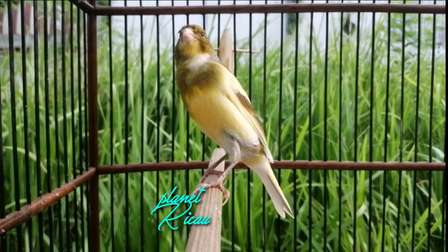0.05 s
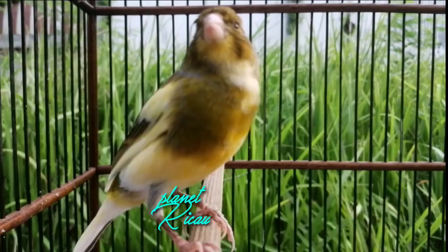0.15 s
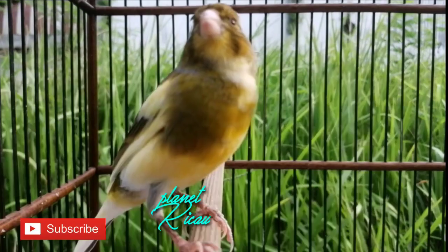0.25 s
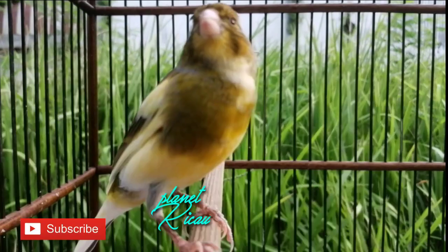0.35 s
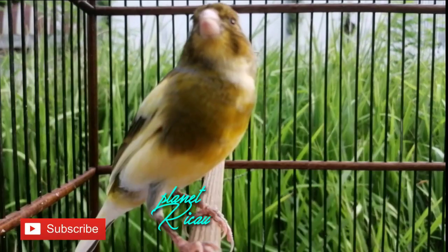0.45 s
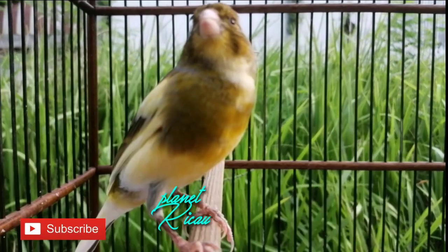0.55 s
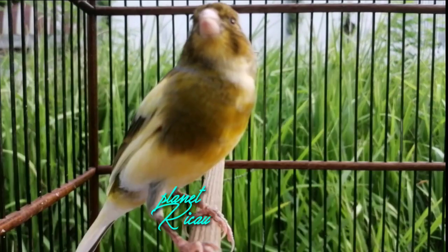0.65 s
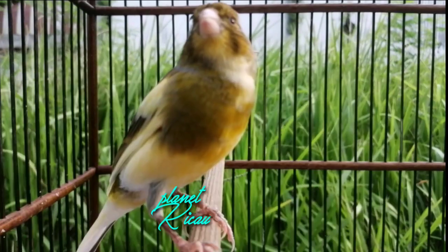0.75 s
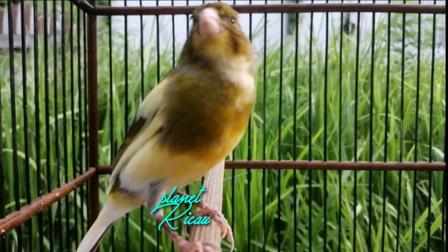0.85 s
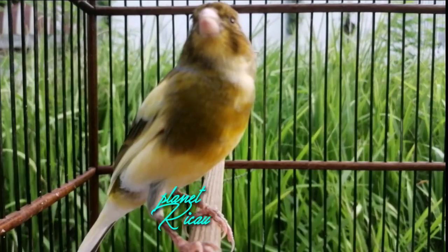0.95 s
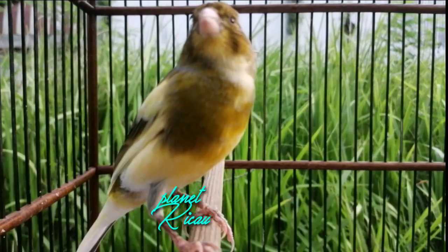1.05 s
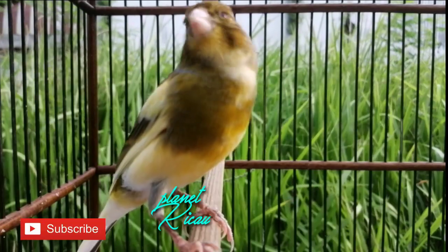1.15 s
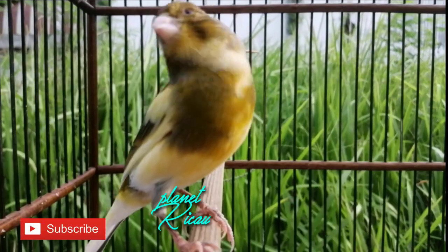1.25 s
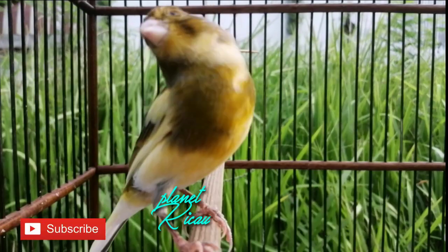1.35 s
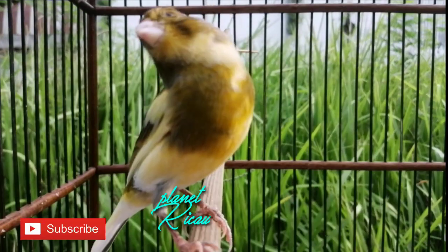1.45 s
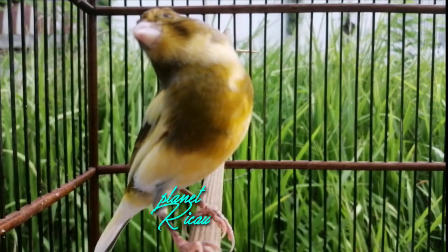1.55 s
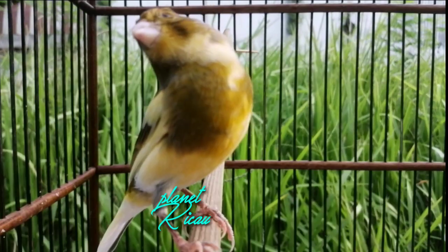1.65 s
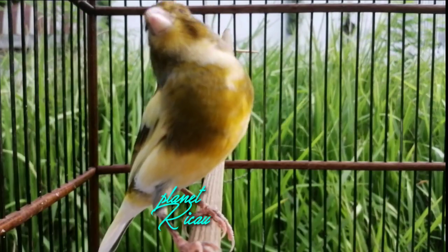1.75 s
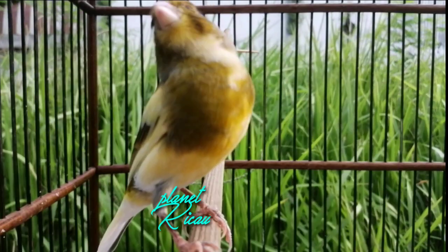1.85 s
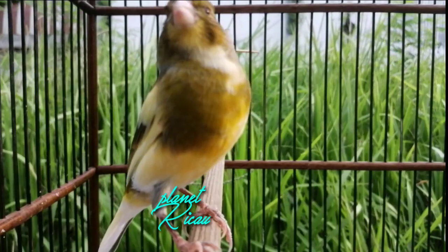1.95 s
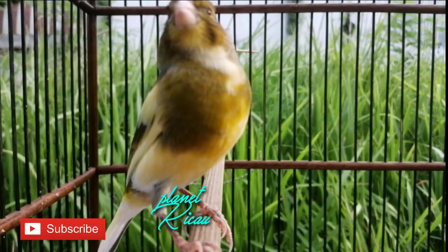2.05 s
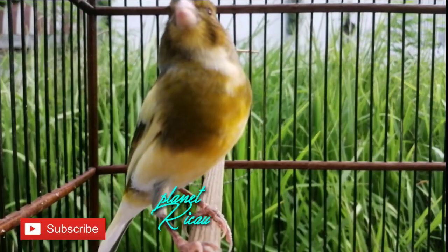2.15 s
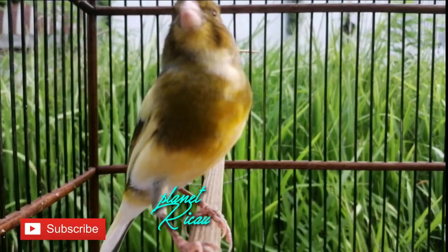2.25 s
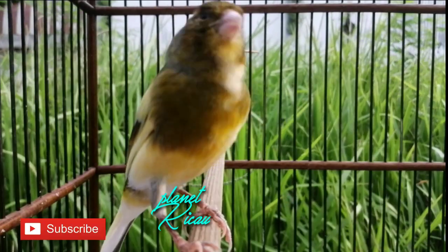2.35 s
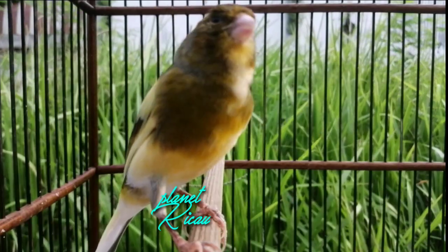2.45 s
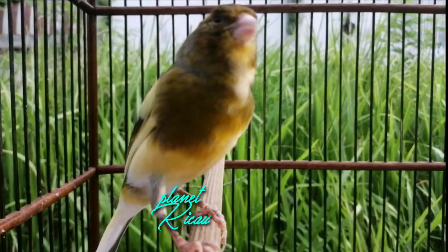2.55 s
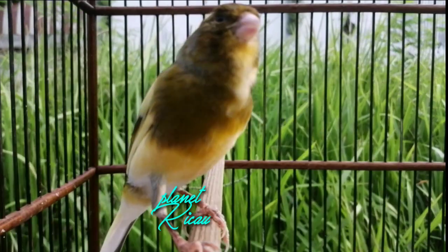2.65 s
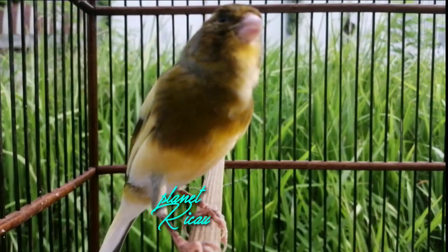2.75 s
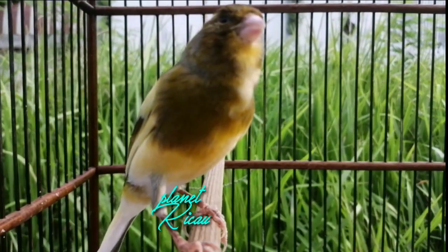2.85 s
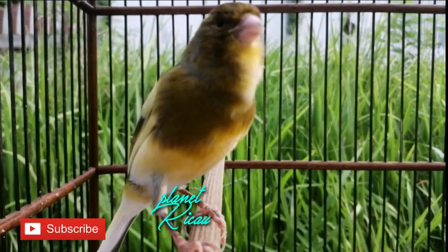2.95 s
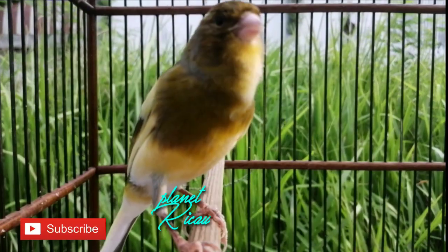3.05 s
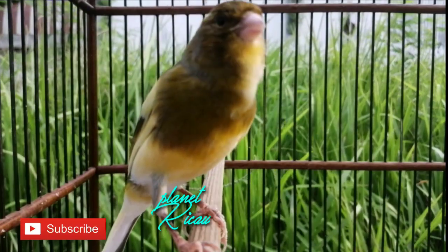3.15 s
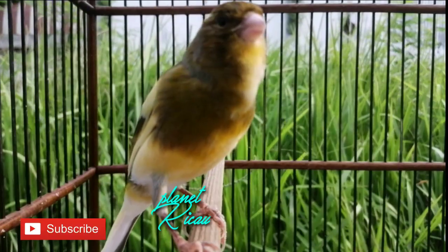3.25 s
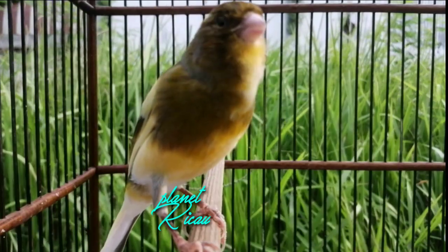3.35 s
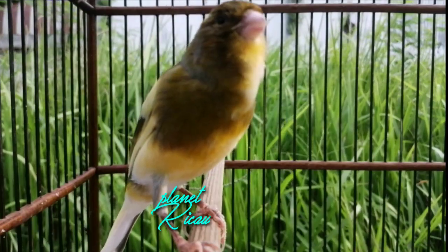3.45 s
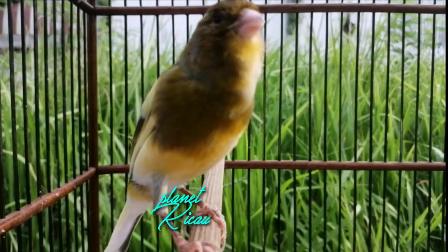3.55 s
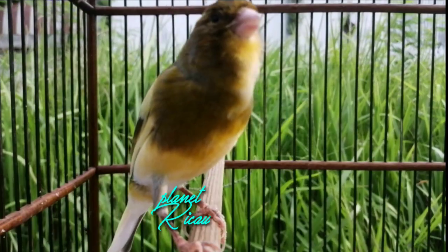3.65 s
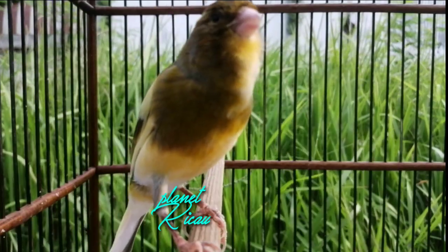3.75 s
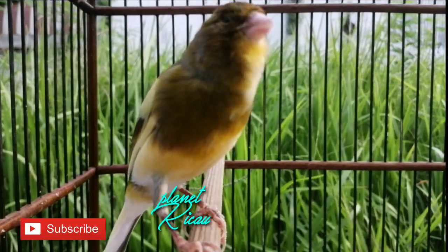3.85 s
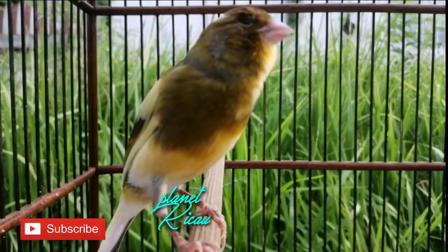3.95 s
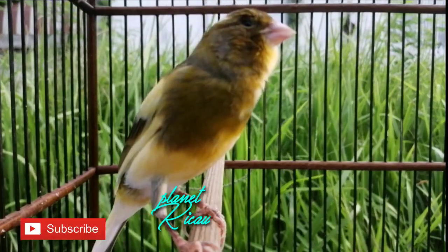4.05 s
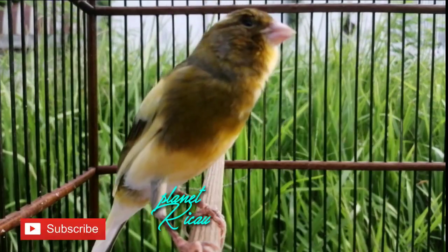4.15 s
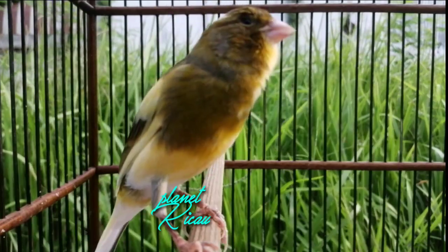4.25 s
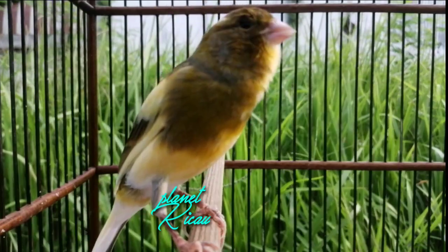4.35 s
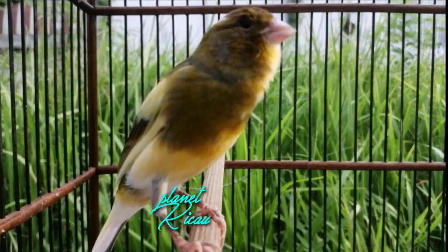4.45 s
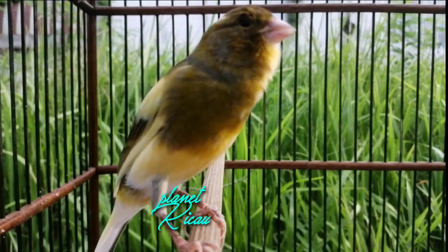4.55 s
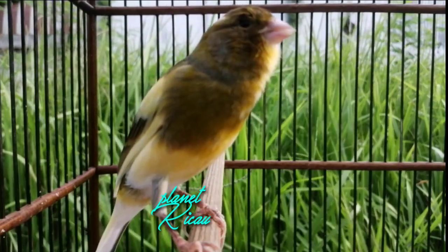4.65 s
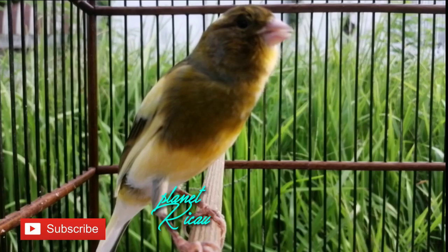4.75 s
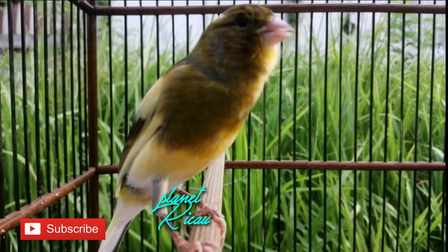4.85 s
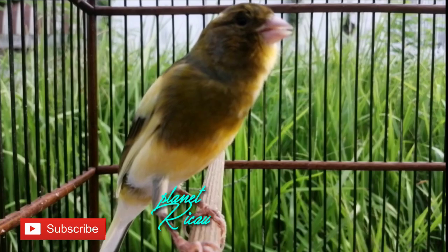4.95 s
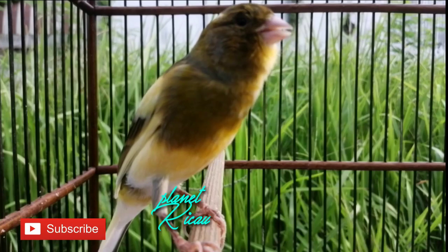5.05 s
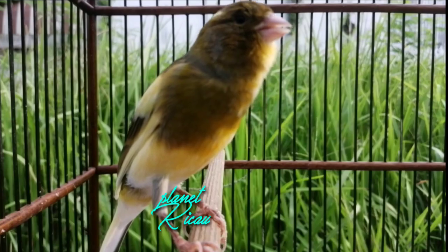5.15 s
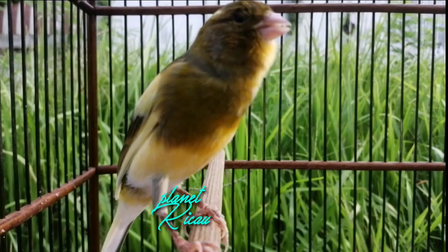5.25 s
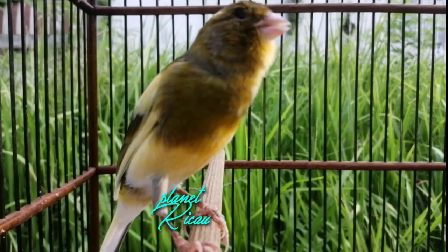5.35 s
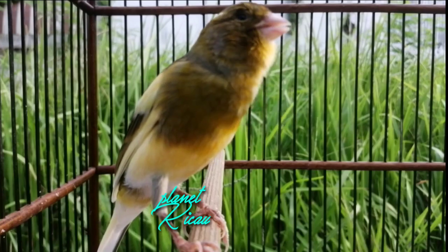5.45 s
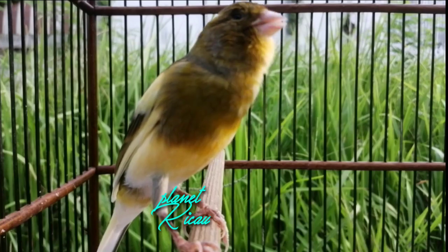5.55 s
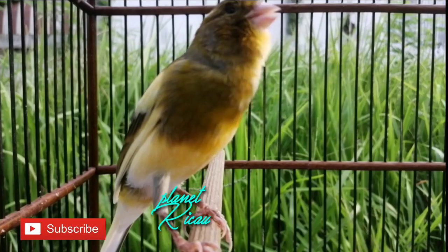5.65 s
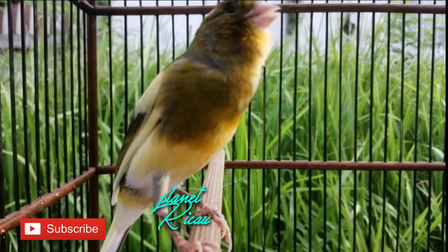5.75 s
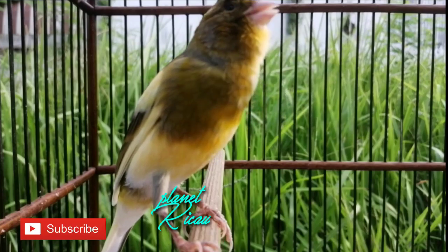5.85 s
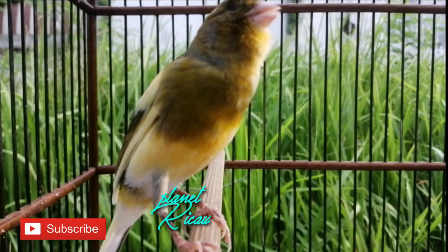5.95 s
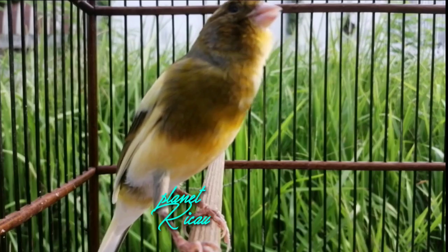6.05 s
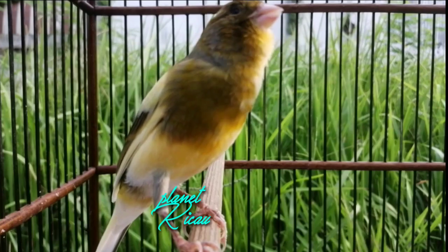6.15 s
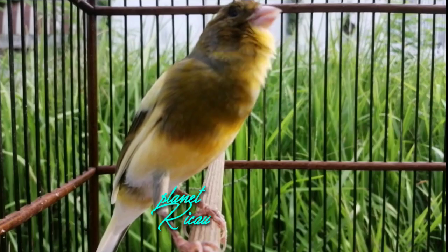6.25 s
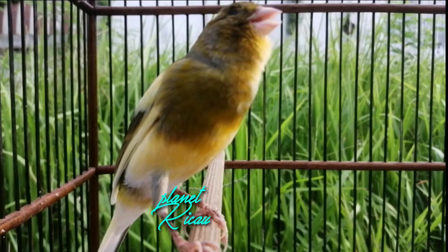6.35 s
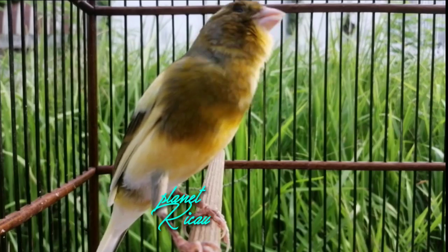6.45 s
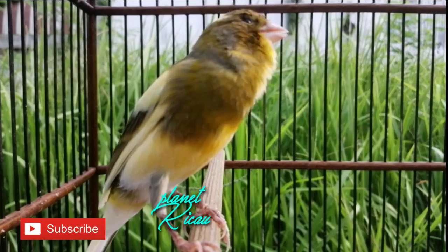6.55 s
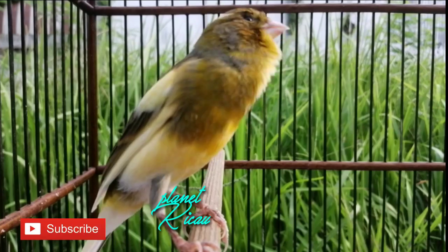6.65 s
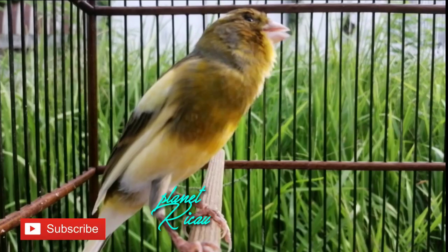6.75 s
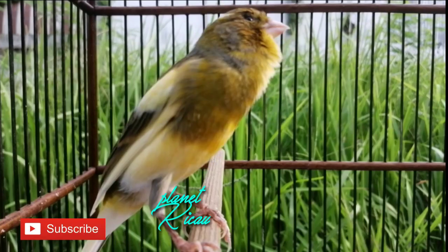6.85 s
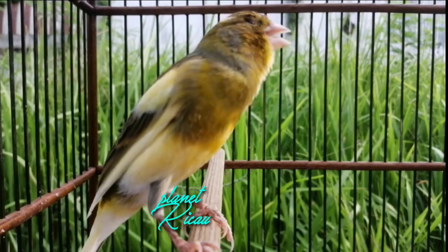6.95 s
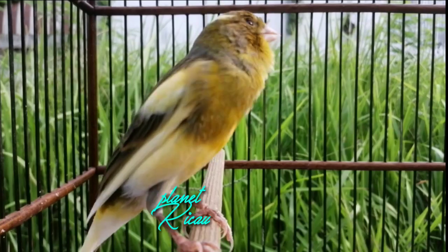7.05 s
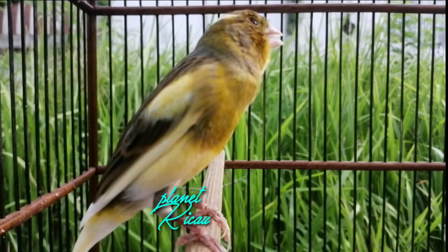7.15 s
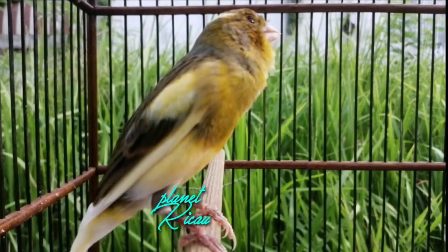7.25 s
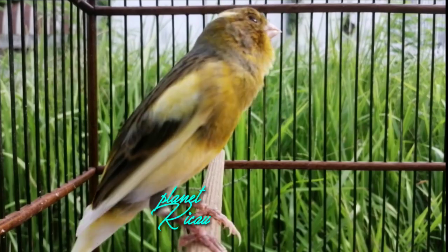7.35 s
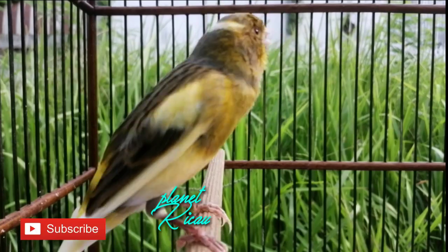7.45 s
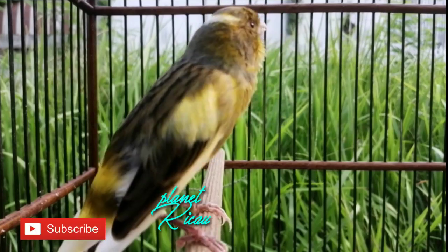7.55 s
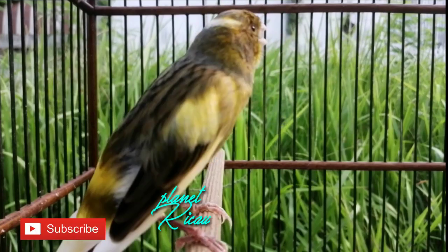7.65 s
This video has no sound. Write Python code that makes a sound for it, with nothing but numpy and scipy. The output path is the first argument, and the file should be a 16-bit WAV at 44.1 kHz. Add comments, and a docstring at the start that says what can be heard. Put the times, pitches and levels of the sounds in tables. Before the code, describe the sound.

Outdoors, a faint low rumble and thin airy hiss, with a second small bird twittering quietly far off. Near three seconds a close canary gives two soft, pure, falling chirps, then ticks into a fast trill that swells. Evenly repeated downward slides follow, each closed by a sharp low chip, and finally loud long whistles swoop from high to low. The microphone is close, with light scattered echoes.

```python
"""A caged canary close to the microphone gives two soft chirps, then sings: a fast trill that swells,
a tour of slides each closed by a sharp chip, and long falling whistles. A second small bird sings
faintly far off, over a low outdoor rumble. Both birds are nearly pure tones that follow drawn pitch
and level tracks, with weak harmonics and scattered echoes; the background is coloured noise and faint low tones."""
import sys
import numpy as np
from scipy import signal
from scipy.fft import rfft, irfft, next_fast_len
from scipy.io import wavfile
from scipy.ndimage import uniform_filter1d

SR = 44100
rng = np.random.default_rng(int(sys.argv[2]) if len(sys.argv) > 2 else 0)


def digitize_waveform(pressure):
    """Quantize a signal to 16-bit integers and store it at the path in sys.argv[1].

    Rows of a 2-D input are taken as channels; values are limited to [-1, 1].
    """
    field = np.atleast_2d(pressure).T
    bounded = np.clip(field, -1, 1)
    quanta = np.round(bounded * 32767).astype(np.int16)
    wavfile.write(sys.argv[1], SR, quanta)


N = 339129


def amp(db):
    """Decibels to a linear gain."""
    return 10 ** (np.asarray(db) / 20)


def evened(x):
    """Scales a signal to an rms of 1."""
    return x / np.sqrt(np.mean(x ** 2) + 1e-20)


def read(points, hz, column=1):
    """Reads a spectrum table, joined by straight lines on a log-frequency axis."""
    points = np.array(points, float)
    return np.interp(np.log(hz + 1), np.log(points[:, 0] + 1), points[:, column])


def curve(rows):
    """A time curve at every sample."""
    return np.interp(np.arange(N) / SR, *np.transpose(rows))


def drift(hz):
    """Smooth chance of rms 1: noise whose spectrum rolls off softly around hz."""
    size = next_fast_len(N)
    f = np.fft.rfftfreq(size, 1 / SR)
    noise = rfft(rng.standard_normal(size))
    return evened(irfft(noise * np.exp(-(f / hz) ** 2), size)[:N])


def stereo_noise(spectrum):
    """Noise of a given colour, most alike left and right near 90 Hz and diffuse in the treble."""
    # Left-right likeness. Each row: frequency in Hz, likeness from 0 to 1.
    likeness = [(30, 0.45), (90, 1), (200, 0.64), (400, 0.61), (800, 0.057), (2000, 0), (15000, 0)]
    hz = np.fft.rfftfreq(N, 1 / SR)
    left, other = rfft(rng.standard_normal((2, N)))
    same = np.clip(read(likeness, hz), -1, 1)
    right = same * left + np.sqrt(1 - same ** 2) * other
    return evened(irfft(np.array([left, right]) * amp(read(spectrum, hz)), N))


def rumble():
    """Distant low noise that swells and sinks along a drawn curve, with a tiny random unsteadiness."""
    # Colour of the outdoor rumble. Each row: frequency in Hz, relative level in dB per Hz.
    rumble_colour = [(12, -38), (20, -7.5), (97, 3), (119, -2), (147, -1.5), (201, -12.5), (241, -13.5),
                     (356, -15), (405, -24.5), (450, -36), (580, -50), (990, -120)]
    # Its swell. Each row: time in seconds, level in dB before the trims.
    rumble_swell = [(0, -52), (.25, -53), (1.1, -58), (1.55, -56.5), (1.8, -57.5), (3.7, -59.5), (4.4, -62),
                    (5.5, -62.5), (5.85, -60.5), (6.2, -63), (7.1, -63), (7.69, -60)]
    gust_db, gust_hz = 0.04, 5
    return stereo_noise(rumble_colour) * amp(curve(rumble_swell) - 1.0 + gust_db * drift(gust_hz))


def air_noise():
    """Soft, nearly even noise across the middle and treble."""
    # Colour of the air. Each row: frequency in Hz, relative level in dB per Hz.
    air_colour = [(200, -15), (450, 0), (700, 1), (1500, 0), (2500, -3), (4000, -8.5), (5300, -4),
                  (7000, -13), (9000, -15.5), (15000, -15)]
    # Its level. Each row: time in seconds, level in dB before the left-right trim.
    air_level = [(0, -65), (1.5, -65), (3, -65.5), (5, -66), (7.69, -68)]
    return stereo_noise(air_colour) * amp(curve(air_level) + 0.69 * drift(18))


def low_tones():
    """Faint distant sines, each swelling and fading with a slightly unsteady pitch."""
    # Each row: start in seconds, length in seconds, pitch in Hz, level in dB before the left-right trim.
    tones = [(.08, 0.19, 95.3, -53), (0.698, 0.17, 94.4, -56), (0.807, 0.21, 350, -68),
             (1.152, 0.34, 348.5, -69), (1.498, 0.15, 97.2, -52.5), (1.596, 0.34, 351, -69),
             (2.658, 0.21, 94.2, -59), (2.911, 0.23, 352, -68.5), (3.322, 0.33, 349.4, -71.5),
             (3.78, 0.15, 141.4, -55), (4.42, 0.1, 143, -58), (5.677, 0.3, 99.4, -56.5),
             (6.857, 0.15, 357, -73)]
    out = np.zeros(N)
    wander = 1 + 0.01 * drift(14.0)
    for s, length, hz, db in tones:
        at = np.arange(int(s * SR), min(int((s + length) * SR), N))
        phase = 2 * np.pi * np.cumsum(hz * wander[at]) / SR
        out[at] += amp(db) * signal.windows.tukey(len(at), .7) * np.sin(phase)
    return out


def background():
    """Rumble, air and low tones together, slightly louder on the right."""
    return (rumble() + air_noise() + low_tones()) * amp([[-.8], [.8]])


def tour(shape, notes):
    """Stretches and transposes one shape for each syllable: tracks of (s, Hz, dB)."""
    share, hz, db = np.transpose(shape)
    return [np.c_[s + share * length, hz * pitch, db + level] for s, length, pitch, level in notes]


def syrinx(tracks, jitter, flutter_db, waver_db, second_db=0, upper_db=0, top_db=0, rasp_db=-70):
    """A nearly pure tone follows each track, with a slight tremble, weak harmonics and a trace of rasp."""
    # Harmonics 2, 3 and 4 as the throat lets them out, one list each.
    # Each row: pitch of the note in Hz, level in dB against the fundamental before the boosts.
    throat = [
        [(2000, -22), (2500, -31), (3000, -46.5), (4400, -40), (5100, -39), (5600, -65.5), (6200, -33.5),
         (6800, -26), (7250, -20)],
        [(2500, -53), (3500, -53), (4400, -41.5), (4800, -36), (5200, -47.5)],
        [(2500, -54.5), (3000, -64.5), (3500, -61), (4000, -67)],
    ]
    boosts_db = [second_db, upper_db, upper_db]
    tremble = 1 + jitter * drift(500)
    unsteady_db = flutter_db * drift(640) + waver_db * drift(110)
    # the rasp level drifts up and down at random
    rasp = amp(rasp_db + 4 * drift(29)) * rng.standard_normal(N)
    out = np.zeros(N)
    for track in tracks:
        s, pitch, level = track.T
        at = np.arange(max(int(s[0] * SR), 0), min(int(s[-1] * SR), N))
        hz = uniform_filter1d(np.interp(at / SR, s, pitch), size=45) * tremble[at]
        loudness = amp(uniform_filter1d(np.interp(at / SR, s, level), size=25) + unsteady_db[at])
        loudness *= signal.windows.tukey(len(at), 60 / len(at))  # 30-sample fades
        phase = 2 * np.pi * np.cumsum(hz) / SR
        tone = np.sin(phase) + rasp[at]
        for harmonic, colour, boost_db in zip([2, 3, 4], throat, boosts_db):
            # a narrow beak (negative top_db) holds back the very top
            gape_db = top_db * np.interp(harmonic * hz, [11000, 13500], [0, 1])
            gain = amp(read(colour, hz) + boost_db + gape_db)
            tone += gain * np.sin(harmonic * phase) * (harmonic * hz < SR / 2)
        out[at] += loudness * tone
    return out


def room(x, gap_s):
    """Scattered reflections of random sign, different at each microphone, each band dying at its own speed."""
    # Echo of the surroundings. Each row: frequency in Hz, relative level in dB, 60 dB decay time in seconds.
    echo_decay = [(1000, -0.5, 0.33), (2800, 1, 0.23), (3820, 1.5, 0.25), (4970, -5.5, 0.28),
                  (7000, 13, 0.16), (9000, -17, .15), (14500, -7, 0.094)]
    count = 22050
    # reflections crowd together with time
    density = .003 + np.arange(count) / count * .03
    taps = rng.standard_normal((2, count)) * (rng.random((2, count)) < density)
    hz, t, z = signal.stft(taps, SR, nperseg=256)
    z *= amp(read(echo_decay, hz)[:, None] - 60 * t / read(echo_decay, hz, column=2)[:, None])
    tail = signal.istft(z, SR, nperseg=256)[1]
    tail *= np.clip(np.arange(tail.shape[1]) / (gap_s * SR), 0, 1) ** 2  # soft onset
    return signal.fftconvolve(x[None], tail / np.linalg.norm(tail[0]), axes=1)[:, :N]


def far_bird():
    """Faint phrases of four syllable shapes from far off, with much echo."""
    # Syllable shapes. Each row: share of the syllable from 0 to 1, pitch in Hz, level in dB.
    slide_shape, rise_shape = [(0, 6070, -3), (.3, 5350, 2.5), (.7, 4920, 1.5), (1, 4460, -41)], [(0, 5150, -9), (.4, 5650, -2), (.7, 5850, 0),
                                                  (1, 5950, -8)]
    hook_shape, pipe_shape = [(0, 6010, -12), (.25, 4960, 2), (.5, 4600, -3), (1, 4480, -6.5)], [(0, 3800, 4), (.3, 3760, -1.5), (.7, 3740, 3.5),
                                                (1, 3700, -12)]
    # Syllables sung. Each row: start in seconds, length in seconds, pitch factor, added level in dB.
    far_slides, far_rises = [(0, 0.012, 0.99, -54), (0.405, 0.026, 1, -66.5), (.45, 0.01, 0.55, -63),
                             (.514, 0.031, 0.96, -68.5), (.554, .011, 0.54, -61), (.616, .026, 1.01, -69),
                             (0.659, 0.0092, 0.55, -59.5), (.719, 0.021, 1.03, -68),
                             (0.763, 0.0097, 0.55, -61.5), (.832, 0.025, 0.94, -63),
                             (2.589, 0.014, 0.56, -62.5), (2.828, 0.0091, .55, -70), (2.945, .01, .54, -67),
                             (3.057, .01, .54, -68), (3.173, .01, .55, -64), (3.284, .01, .54, -64)], [(.9, 0.041, 0.96, -61), (0.998, 0.035, 0.96, -57.5),
                                                 (1.088, 0.047, 1.01, -64), (1.186, 0.036, 1, -59.5),
                                                 (1.275, 0.034, 1.01, -59), (1.37, 0.039, 1, -62.5),
                                                 (1.464, 0.027, .68, -70), (1.572, 0.024, 0.62, -65.5),
                                                 (1.68, 0.023, 0.625, -63), (1.795, 0.024, .67, -64),
                                                 (1.903, 0.026, 0.64, -65), (2.018, 0.025, 0.65, -65),
                                                 (2.135, 0.028, 0.66, -68), (2.25, 0.025, 0.61, -65.5)]
    far_hooks, far_pipes = [(1.482, 0.023, 1.02, -55), (1.594, 0.014, 0.99, -55.5),
                            (1.702, 0.015, 1.01, -55.5), (1.817, 0.016, 1.01, -54.5),
                            (1.928, 0.022, 0.97, -57.5), (2.04, 0.019, 0.99, -57.5),
                            (2.156, 0.039, .99, -59.5), (2.27, .03, 0.96, -61.5),
                            (2.377, 0.026, 0.97, -56.5)], [(.21, 0.092, 1.84, -86), (.9, 0.041, .81, -69.5),
                                               (1, 0.035, 0.78, -67.5), (1.088, 0.045, 0.8, -63),
                                               (1.185, 0.031, .81, -66), (1.275, 0.036, 0.83, -68),
                                               (1.375, 0.019, 0.84, -67), (2.5, 0.04, 1.02, -72),
                                               (2.61, 0.048, 1, -69), (2.72, 0.05, 1.01, -74),
                                               (2.96, 0.037, 1, -74), (3.07, 0.045, 0.96, -69),
                                               (3.305, 0.044, 0.95, -62)]
    tracks = tour(slide_shape, far_slides) + tour(rise_shape, far_rises)
    tracks += tour(hook_shape, far_hooks) + tour(pipe_shape, far_pipes)
    song = syrinx(tracks, jitter=0.016, flutter_db=3.0, waver_db=-1.6)
    return amp(-3.5) * song + amp(-12.0) * room(song, gap_s=0.0013)


def soft_chirps():
    """Two gently falling, very pure calls."""
    # Each row: share of the syllable from 0 to 1, pitch in Hz, level in dB.
    chirp_shape = [(0, 4460, -23), (.1, 4450, -1), (.27, 4200, -1), (.45, 3873, -1.5), (.66, 3760, 1.5),
                   (.9, 3600, -1), (.965, 3570, -3), (1, 3350, -30)]
    # Each row: start in seconds, length in seconds, pitch factor, added level in dB.
    chirp_notes = [(2.846, 0.12, 0.997, -42), (3.125, 0.13, 1, -43)]
    return syrinx(tour(chirp_shape, chirp_notes), jitter=0.00084, flutter_db=0.3, waver_db=1.6,
                  second_db=8.5, upper_db=-5, rasp_db=-60)


def opening_ticks():
    """Short, raspy falling ticks that begin the trill."""
    # Each row: share of the syllable from 0 to 1, pitch in Hz, level in dB.
    tick_shape = [(0, 6300, -17), (.2, 5630, -17), (.39, 5430, -7), (.64, 4820, -4.5), (.88, 3750, -3),
                  (.95, 3350, -1), (1, 3280, -6)]
    # Each row: start in seconds, length in seconds, pitch factor, added level in dB.
    tick_notes = [(3.3404, 0.016, 1.05, -42), (3.3872, 0.018, 1.03, -41), (3.4351, 0.019, 0.99, -40),
                  (3.4837, 0.019, 1.02, -42), (3.529, 0.023, 1.02, -41.5), (3.5803, 0.021, 1.06, -40),
                  (3.628, 0.0233, 1.08, -41), (3.6788, 0.021, 1.07, -38.5), (3.729, 0.021, 1.08, -39)]
    return syrinx(tour(tick_shape, tick_notes), jitter=0.0027, flutter_db=3.0, waver_db=0.6,
                  second_db=15, upper_db=-6, top_db=-18, rasp_db=-30)


def swelling_trill():
    """Fast downward sweeps that grow louder: first zips, then sweeps with a kink."""
    # Each row: share of the syllable from 0 to 1, pitch in Hz, level in dB.
    zip_shape, kink_shape = [(0, 7220, -21), (.08, 7200, -12.5), (.22, 6440, -16), (.42, 5540, -3.5),
                             (.64, 5060, -0.5), (.8, 4300, -0.5), (.9, 3650, -0.5), (.96, 3390, -5),
                             (1, 3260, -27)], [(0, 7250, -22), (.07, 7230, -13), (.19, 6330, -17),
                                          (.33, 5400, 0), (.47, 4940, -6.5), (.7, 4540, -3.5),
                                          (.89, 3760, -0.5), (.95, 3380, -2), (1, 3300, -28)]
    # Each row: start in seconds, length in seconds, pitch factor, added level in dB.
    zip_notes, kink_notes = [(3.7793, 0.024, 0.96, -35.5), (3.8258, 0.027, 1, -35),
                             (3.875, 0.026, 0.99, -33), (3.9246, 0.027, 1, -33), (3.974, 0.026, 1.04, -32),
                             (4.02, 0.03, 1.005, -33), (4.0732, 0.0279, 0.98, -32.5),
                             (4.1253, 0.021, 1, -31.5), (4.1742, 0.027, 0.96, -31.5)], [(4.2226, 0.03, 0.98, -31), (4.2731, 0.031, 0.99, -31),
                                           (4.324, 0.031, 1.01, -32), (4.3761, 0.03, 1.03, -31),
                                           (4.431, 0.029, 1.004, -30.5), (4.4805, 0.032, 1, -31),
                                           (4.5336, 0.032, 1.014, -29.5), (4.587, 0.031, 1.004, -29),
                                           (4.641, 0.0307, 1.004, -28.5), (4.6911, 0.031, 1.022, -29),
                                           (4.7435, 0.029, 1.044, -30.0), (4.7999, 0.027, 1.05, -28)]
    return syrinx(tour(zip_shape, zip_notes) + tour(kink_shape, kink_notes), jitter=0.003,
                  flutter_db=.9, waver_db=.4, second_db=7, upper_db=-1, top_db=-11, rasp_db=-33.0)


def gate(t, length, attack_s, release_s):
    """Attack, hold and release of a note, in dB."""
    opening = np.minimum(t / attack_s, (length - t) / release_s)
    return 20 * np.log10(np.clip(opening, 1e-2, 1))


def slide(s, length, end_hz, db):
    """After a short hold the pitch falls at a nearly even rate: a track of (s, Hz, dB)."""
    # How strongly each pitch of a slide carries. Each row: pitch in Hz, level in dB.
    slide_carry = [(4000, -6), (4350, 1.5), (4650, -3.5), (5500, 1.5), (6000, -10.5), (6500, -24),
                   (7300, -13.5)]
    top_hz, hold_s, attack_s, release_s = 7170, 0.0084, .003, 0.0085
    # slides longer than this bow upward, shorter ones sag
    straight_s, bow_hz_per_s = 0.064, 21000
    t = np.arange(int(length * SR)) / SR
    fall = np.interp(t, [hold_s, length], [0, 1])
    bow = bow_hz_per_s * (length - straight_s) * np.sin(np.pi * fall ** 2)
    hz = top_hz + (end_hz - top_hz) * fall + bow
    return np.c_[s + t, hz, db + read(slide_carry, hz) + gate(t, length, attack_s, release_s)]


def falling_slides():
    """The tour of clear downward slides."""
    # Each row: start in seconds, length in seconds, closing pitch in Hz, level in dB before the carry.
    slide_notes = [(4.8484, 0.043, 3830, -30), (4.9267, 0.065, 4080, -29.5), (5.0298, 0.064, 4090, -29.5),
                   (5.1334, 0.061, 4170, -28), (5.2332, 0.061, 4160, -29), (5.3325, 0.062, 4080, -29),
                   (5.4356, 0.061, 4080, -29.5), (5.5358, 0.062, 4100, -28.5), (5.6391, 0.06, 4150, -28.0),
                   (5.7367, 0.064, 4040, -29), (5.838, 0.063, 4180, -27.5), (5.9398, 0.065, 4150, -28),
                   (6.0439, 0.063, 4190, -27.5), (6.1488, 0.064, 4160, -27.5), (6.2514, 0.066, 4090, -28),
                   (6.358, 0.079, 4070, -24.5)]
    return syrinx([slide(*row) for row in slide_notes], jitter=.002, flutter_db=0.04, waver_db=0.76,
                  second_db=1.5, upper_db=1, top_db=3, rasp_db=-47)


def chip_clicks(notes):
    """A faint damped low click, a tiny decaying sine, sounds seven tenths through each chip."""
    click_db, decay_s, click_hz = -23, 0.00067, 1980
    out = np.zeros(N)
    t = np.arange(SR // 100) / SR
    for s, length, pitch, db in notes:
        out[int((s + .7 * length) * SR)] = amp(db + click_db)
    return np.convolve(out, np.exp(-t / decay_s) * np.sin(2 * np.pi * click_hz * t))[:N]


def sharp_chips():
    """A short low falling note, with a faint click inside it, closes each slide."""
    # Each row: share of the syllable from 0 to 1, pitch in Hz, level in dB.
    chip_shape = [(0, 3950, -24), (.145, 3530, -26), (.31, 3340, -12.5), (.5, 3008, 5), (.625, 2884, 3.5),
                  (.72, 2650, -1), (.84, 2512, -4), (1, 2350, -16.5)]
    # Each row: start in seconds, length in seconds, pitch factor, added level in dB.
    chip_notes = [(4.8938, 0.015, 1.012, -24), (4.9972, 0.014, 1, -23.5), (5.0977, 0.015, 1, -23.5),
                  (5.201, 0.011, 1.01, -21.5), (5.3004, 0.011, 1.017, -21.5), (5.399, 0.015, 1.013, -22.5),
                  (5.5022, 0.014, 1.01, -21), (5.6025, 0.014, 1.02, -23), (5.7036, 0.014, 1.036, -22.5),
                  (5.8034, 0.016, 1.012, -24.5), (5.9061, 0.015, 1.02, -24), (6.008, 0.017, 1.023, -25),
                  (6.1134, 0.015, 1.027, -22.5), (6.217, 0.017, 1.01, -23), (6.3207, 0.016, 1.02, -23.5),
                  (6.4407, 0.017, 1.026, -22)]
    voice = syrinx(tour(chip_shape, chip_notes), jitter=0.01, flutter_db=.6, waver_db=.4,
                   second_db=8.0, upper_db=7.5, rasp_db=-47.0)
    return voice + chip_clicks(chip_notes)


def whistle(s, length, hold_s, sag_s, low_hz, attack_s, close_s):
    """The pitch leaps up, holds, relaxes ever more slowly and sinks as the note shuts: a track of (s, Hz, dB)."""
    # How strongly each pitch of a whistle carries. Each row: pitch in Hz, level in dB.
    whistle_carry = [(2000, -13.5), (2550, -3), (2850, -5), (3050, 1.5), (3400, -4), (4200, -10),
                     (4500, -3.5), (4850, -6.5), (5150, -1), (5750, -4), (6200, -14.5), (7200, -14)]
    top_hz, level_db, release_s = 7368, -20.5, 0.0047
    leap_s, leap_depth = 0.0068, 0.47  # the leap starts this share below the top
    close_depth = 0.36  # share by which the pitch sinks at the end
    bend_s = .005  # the hold bends smoothly into the sag
    t = np.arange(int(length * SR)) / SR
    relaxing = bend_s * np.logaddexp(0, (t - hold_s) / bend_s)
    close = 1 - close_depth * np.maximum(1 - (length - t) / close_s, 0) ** 2
    hz = (low_hz + (top_hz - low_hz) * np.exp(-relaxing / sag_s)) * close
    leap = 1 - leap_depth * np.maximum(1 - t / leap_s, 0) ** 2
    db = level_db + read(whistle_carry, hz) + gate(t, length, attack_s, release_s)
    return np.c_[s + t, hz * leap, db]


def long_whistles():
    """Long whistles that leap up, hold, then sag towards a low pitch."""
    # Each row: start in seconds, length in seconds, hold in seconds, sag time in seconds,
    # pitch sagged towards in Hz, attack in seconds, closing time in seconds.
    whistle_notes = [(6.476, .161, .031, .138, 0, .035, .035),
                     (6.6625, .192, .0175, .088, 1490, .003, .009),
                     (6.8876, 0.198, .014, .088, 1640, .003, .009),
                     (7.1159, 0.2, .016, .083, 1760, .003, .009),
                     (7.3493, 0.199, .0165, .082, 1800, .003, .009),
                     (7.5837, 0.199, .015, .084, 1750, .003, .009)]
    return syrinx([whistle(*row) for row in whistle_notes], jitter=0.0011, flutter_db=.3, waver_db=1.0,
                  second_db=-2.0, upper_db=4.0, top_db=2, rasp_db=-50.0)


def microphones(x, sides, lag_ms):
    """Direct sound reaches the left first, and louder at most pitches; near surfaces send back single echoes."""
    # Near surfaces. Each row: delay in milliseconds, level in dB.
    surfaces = [(4.2, -25.5), (7.5, -24.5), (23.8, -38), (25.7, -34), (29, -42), (43.5, -56)]
    size = next_fast_len(N + SR)
    hz = np.fft.rfftfreq(size, 1 / SR)
    ratio = amp(read(sides, hz))

    def late(ms):
        """A pure delay, as a turn of phase."""
        return np.exp(-2j * np.pi * hz * ms / 1000)

    direct = np.array([ratio * late(-lag_ms / 2), late(lag_ms / 2)])
    direct *= np.sqrt(2 / (1 + ratio ** 2))  # same total power at every pitch
    echoes = 0
    for k, (ms, db) in enumerate(surfaces):
        right_ms = ms + lag_ms * (-1) ** k  # echoes lead on alternate sides
        echoes = echoes + amp(db) * np.array([late(ms), late(right_ms)])
    return irfft(rfft(x, size) * (direct + echoes), size)[:, :N]


def canary():
    """The near bird: fast tours raspier, long whistles purer; its colour changes as it lowers its head."""
    # Cage reflections colour the two microphones differently, here with the head up and lowered.
    # Each row: frequency in Hz, left minus right in dB.
    sides_up, sides_lowered = [(2500, 9.5), (2850, 4.5), (3200, 12), (3450, 8), (3750, 18), (4100, 28),
                               (4400, 9), (4650, 0.5), (4950, 19), (5200, 3), (5500, 4), (6000, -3.5),
                               (6500, 15.5), (7200, 8)], [(2100, 13), (2350, 0.5), (2620, 15.5), (2880, -16),
                                              (3220, 33), (3400, 8.5), (3880, 20), (4250, 9.5), (4550, 9.5),
                                              (4850, 5.5), (5300, 7.5), (5700, 1), (6150, -8), (6600, 5)]
    turn_s = 6.47
    chirps = soft_chirps()
    trill = opening_ticks() + swelling_trill()
    slides = falling_slides()
    chips = sharp_chips()
    whistles = long_whistles()
    song = chirps + trill + slides + chips + whistles
    turned = np.arange(N) > turn_s * SR
    near = microphones(song * ~turned, sides_up, lag_ms=0.21)
    near += microphones(song * turned, sides_lowered, lag_ms=0.2024)
    # the opening trill carries more echo than the long whistles
    aside = chirps + amp(7) * trill + amp(0.5) * slides + amp(-1.0) * chips + amp(-2.5) * whistles
    return near + amp(-26.5) * room(aside, gap_s=.003)


def scene():
    """The background and the far bird, with the canary in front."""
    return background() + far_bird() + canary()


def record(dry):
    """The recorder's band limit: a steep low-pass at 15.5 kHz."""
    lowpass = signal.firwin(511, 15500, window=("kaiser", 9), fs=SR)
    return signal.oaconvolve(dry, lowpass[None], "same")


dry = scene()
out = record(dry)
digitize_waveform(out)
```